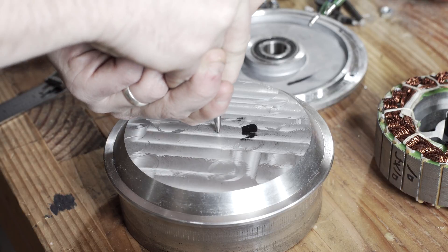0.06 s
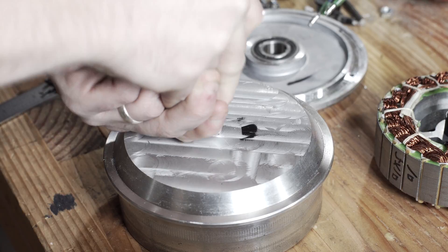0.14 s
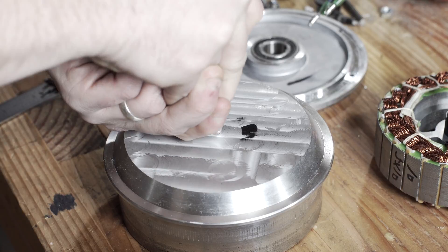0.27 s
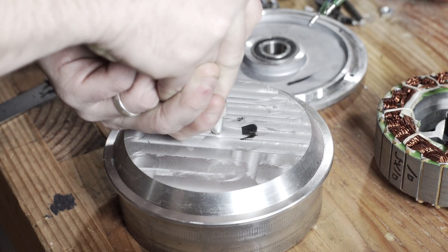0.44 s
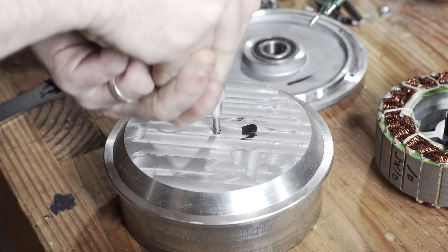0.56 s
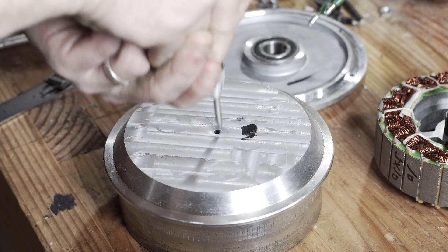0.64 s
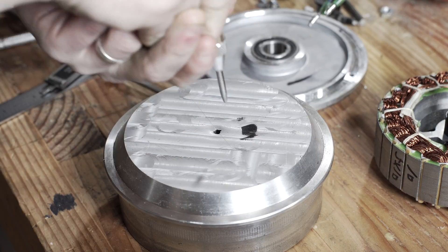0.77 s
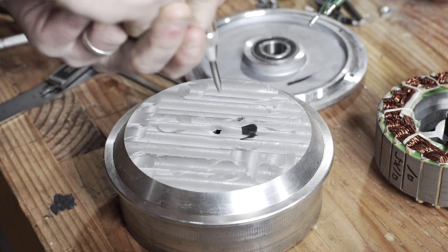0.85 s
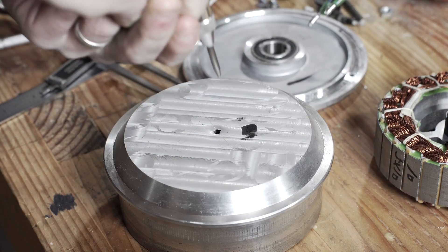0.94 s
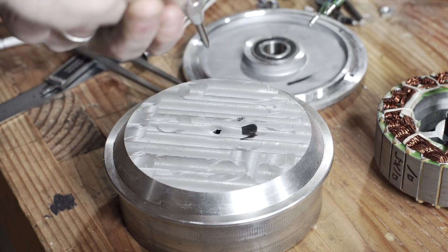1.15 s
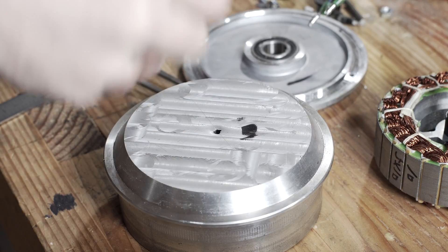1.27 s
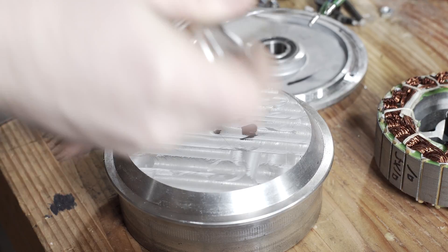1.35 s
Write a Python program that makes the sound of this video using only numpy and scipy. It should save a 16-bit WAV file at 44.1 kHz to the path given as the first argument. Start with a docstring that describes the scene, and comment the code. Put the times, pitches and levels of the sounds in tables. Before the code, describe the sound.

A spring-loaded punch snaps once on an aluminum casing, then scrapes faintly away.

```python
"""Soft knocks and a dull rub, then one hard snap: a spring-loaded metal punch fires on an aluminium
motor casing on a wooden bench, close to a single microphone in a quiet workshop.
The snap overloads the microphone; the punch rebounds, and the casing and the room ring on.
The sleeve slides back with a thin hiss; the tip scrapes and squeaks out of its dent and rings briefly."""
import sys
import numpy as np
from scipy import signal
from scipy.fft import rfft, irfft
from scipy.io import wavfile
from scipy.ndimage import uniform_filter1d

SR = 44100
rng = np.random.default_rng(int(sys.argv[2]) if len(sys.argv) > 2 else 0)


def to_wav(sig):
    """Store sig (one row per channel, or 1-D mono) as 16-bit WAV at the path in sys.argv[1].

    Samples outside -1..1 are clipped; the rate is SR.
    """
    pcm = np.clip(np.atleast_2d(sig), -1, 1) * 32767
    pcm = np.round(pcm).astype(np.int16)
    wavfile.write(sys.argv[1], SR, pcm.T)  # frames by channels


N = 61739
T = np.arange(N) / SR

# The snap and its rebounds. Each row: start in seconds, crack level in dB, its hold and release in
# seconds, air push in dB, gain of the steel ring in dB, treble cut-off of the crack in Hz.
BLOWS = [(0.2153, -4.5, .0022, .0016, -1.5, 3.5, 18000), (0.2253, -15.5, .001, 0.0028, -12.5, -23, 3000),
         (0.2274, -9, .0004, .0016, -4, -22, 7524)]
SNAP_S = BLOWS[0][0]


def amp(db):
    """Decibels to gain."""
    return 10 ** (np.asarray(db) / 20)


def unit(x):
    """Scales to rms 1."""
    return x / np.sqrt(np.mean(x ** 2) + 1e-20)


def since(start):
    """Seconds since a moment, zero before it."""
    return np.maximum(T - start, 0)


def curve_at(points, hz):
    """Interpolates a table on a log-frequency axis."""
    freqs, values = np.transpose(points)
    return np.interp(np.log(hz + 1), np.log(freqs + 1), values)


def noise(colour):
    """Steady noise at rms 1. Each row of a colour: frequency in Hz, relative level in dB."""
    gain = amp(curve_at(colour, np.fft.rfftfreq(N, 1 / SR)))
    return unit(irfft(rfft(rng.standard_normal(N)) * gain, N))


def bursts(rows, decay_s):
    """Envelope of sudden bursts that die quickly."""
    return sum(amp(db) * (T > start) * np.exp(-since(start) / decay_s) for start, db in rows)


def ring(start, modes, rise_s):
    """Dying sines struck together. Each mode: frequency in Hz, level in dB, seconds to fall 60 dB."""
    t = since(start)
    tones = sum(amp(db - 60 * t / t60) * np.sin(2 * np.pi * (hz * t + rng.random()))
                for hz, db, t60 in modes)
    return tones * np.minimum(t / rise_s, 1)


def reverberation(start):
    """Diffuse echoes of the workshop build up, then die fastest in the deep bass and the treble."""
    # Colour of the room. Each row: frequency in Hz, relative level in dB.
    colour = [(40, -28.5), (110, -19.5), (230, -5.5), (320, -13.5), (410, -4.5), (540, -2.5), (640, -7),
              (780, -3), (940, -1.5), (1060, -7.5), (1400, -5), (2300, -5.5), (3600, -11.5), (5200, -2.5),
              (6500, -3), (9000, -10.5), (13500, -11.5), (16000, -21)]
    # Decay of the room. Each row: frequency in Hz, seconds to fall 60 dB.
    t60 = [(100, 0.24), (260, .63), (700, 0.65), (1840, 0.61), (4850, 0.49), (8000, 0.4), (12800, 0.32),
           (16000, .28)]
    hz, t, spectrum = signal.stft(noise(colour), SR, nperseg=512)
    decay = amp(-60 * np.maximum(t - start, 0) / curve_at(t60, hz)[:, None])
    build = .3 + .7 * np.minimum(since(start) / .045, 1) ** 2
    return signal.istft(spectrum * decay, SR, nperseg=512)[1][:N] * build * (T > start)


def workshop():
    """Room tone, with the snap coming back off nearby surfaces and then from all round."""
    # Early echoes. Each row: arrival in seconds, level in dB.
    arrivals = [(.2455, -20.5), (.2545, -21.5), (.2625, -24)]
    # Colours of the dull echoes and the room tone. Each row: frequency in Hz, relative level in dB.
    echo_colour = [(50, -13), (100, -14), (170, 1.5), (300, -5), (500, 3.5), (900, -2.5), (1500, -9.5),
                   (4000, -18.5), (16000, -30)]
    room_tone = [(20, -15), (45, -4), (90, -7), (250, -1.5), (500, -4.5), (1000, -9.5), (2500, -13),
                 (6000, -17), (15500, -22.5)]
    echoes = bursts(arrivals, decay_s=.0053) * noise(echo_colour)
    return echoes + amp(-13) * reverberation(SNAP_S) + amp(-65) * noise(room_tone)


def hand():
    """Soft knocks and a dull rub as the hand seats the punch and presses down."""
    # Seating knocks. Each row: start in seconds, level in dB, frequency in Hz, seconds to fall 60 dB.
    contacts = [(.0345, -43, 1040, 0.033), (.040, -44, 805, 0.025), (.048, -54.5, 316, 0.084),
                (.085, -60.5, 880, 0.061), (.150, -53, 788, 0.11)]
    # Rub of the grip. Each row: frequency in Hz, relative level in dB.
    rub_colour = [(40, -18), (220, 4), (600, 0.5), (1050, -1), (1500, -16), (4000, -25), (16000, -46)]
    knocks = sum(ring(start, [(hz, db, t60)], rise_s=.00051) for start, db, hz, t60 in contacts)
    pressure = np.interp(T, [.02, .04, .12, .2], [.37, .82, .47, .0038])
    return knocks + amp(-56.5) * pressure * noise(rub_colour)


def sleeve():
    """The sleeve slides back over the relaxing spring with an uneven, thin hiss."""
    # Sliding hiss. Each row: frequency in Hz, relative level in dB.
    hiss_colour = [(200, -10.5), (1700, -1), (4000, -5), (8000, -14), (10500, -4.5), (14000, -2.5),
                   (16000, -13.5)]
    grit_db = 2.5 * noise([(1, 0), (110, 0), (1100, -60)])
    swell = np.interp(T, [.58, .685, .8], [0, 1, 0])
    return amp(-58 + grit_db) * swell * noise(hiss_colour)


def tip_lift():
    """The tip squeaks, scrapes and catches on its way out of the dent, then rings free."""
    # The drag. Each row: time in seconds, squeak pitch in Hz, squeak level in dB, scrape level in dB.
    path = [(.713, 3100, -77, -60), (.720, 3143, -39, -51.5), (0.724, 3110, -48.5, -53),
            (.730, 3183, -46, -50), (.737, 3090, -46, -48), (0.742, 3270, -49, -52.5),
            (0.747, 3550, -48, -50.5), (0.754, 3400, -75, -72)]
    # Catches on the rim of the dent. Each row: start in seconds, level in dB.
    catches = [(.7285, -47), (0.7365, -50), (0.742, -58), (0.748, -56)]
    # Friction of the tip. Each row: frequency in Hz, relative level in dB.
    scrape_colour = [(200, -9), (1200, -10.5), (1750, 5.5), (2400, 2), (4400, -4.5), (6200, 6.5),
                     (7800, -4.5), (9500, 3), (12000, -17), (14300, -5), (16000, -24)]
    # Modes of a rim tick and the freed tip. Each row: frequency in Hz, level in dB, seconds to fall 60 dB.
    rim_modes = [(1770, -0.5, 0.0095), (6200, -8, .012)]
    tip_modes = [(3182, -63, .1), (5300, -64, 0.2), (6100, -58, 0.18)]
    times, hz, squeak_db, scrape_db = np.transpose(path)
    touching = (T > times[0]) & (T < times[-1])
    jitter = .0285 * unit(uniform_filter1d(rng.standard_normal(N), size=70))
    phase = 2 * np.pi * np.cumsum(np.interp(T, times, hz) * (1 + jitter)) / SR
    harmonics = sum(amp(-20 * k) * np.sin((k + 1) * phase) for k in range(3))
    squeak = touching * amp(np.interp(T, times, squeak_db)) * harmonics
    friction = touching * amp(np.interp(T, times, scrape_db)) + bursts(catches, decay_s=.0017)
    scrape = friction * noise(scrape_colour)
    ticks = sum(amp(db) * ring(start, rim_modes, rise_s=.00046) for start, db in catches)
    direct = squeak + scrape + ticks
    room = reverberation(0)
    echoes = signal.fftconvolve(direct, room / np.linalg.norm(room))[:N]
    return direct + amp(-18.5) * echoes + ring(catches[-1][0], tip_modes, rise_s=.001)


def casing():
    """The blow pushes the bench, rings the casing and wakes a deep mode of the room; each mode swells and fades
    in the room."""
    # Modes of the casing on the bench. Each row: frequency in Hz, level in dB, seconds to fall 60 dB.
    modes = [(235.8, -40.5, 0.74), (255.8, -40.5, 0.64), (394.4, -26.5, .48), (499.7, -25.5, .5),
             (522.6, -30.5, 0.48), (555.5, -30, .52), (712.5, -31.5, .48), (747.6, -30.5, .48),
             (835.5, -28, .5), (885.5, -30, .62), (951, -29, .58), (1207, -34.5, .58), (1393, -31.5, .38),
             (1483, -30.5, .4), (1553, -32, .45), (2150, -39, 0.85), (2227, -36.5, 0.73), (5101, -37, 0.46),
             (6403, -30.5, .26), (7650, -44.5, 0.59), (7865, -37, .32), (11774, -37.5, .25),
             (12167, -39, .27), (12560, -33.5, .29), (12300, -30, .3)]
    thump_hz, room_mode_hz, flutter_hz, rise_s = 109, 38, 14, .022
    t = since(SNAP_S)
    thump = amp(-27.5) * np.exp(-t / .0032) * np.sin(2 * np.pi * thump_hz * t)
    room_mode = ring(SNAP_S, [(room_mode_hz, -48, 1.1)], rise_s)
    flutter = [(1, 0), (flutter_hz, 0), (10 * flutter_hz, -80)]
    ringing = sum(ring(SNAP_S, [mode], rise_s) * (1 + .45 * noise(flutter)) for mode in modes)
    return thump + room_mode + ringing


def snap():
    """Each blow is a burst of contact noise, a sharp push of air and a short ring of the steel."""
    # Contact noise. Each row: frequency in Hz, relative level in dB.
    crack_colour = [(60, -15), (300, -10.5), (900, -11), (1400, 4.5), (2200, 3.5), (3600, -1), (4500, -3.5),
                    (6000, 0.5), (8000, -5), (10000, 1), (11500, -4.5), (13000, 3), (16000, -7)]
    # Steel punch, damped by the hand. Each row: frequency in Hz, level in dB, seconds to fall 60 dB.
    steel_modes = [(1460, -22, 0.0055), (2250, -20.5, 0.014), (4900, -23, .016), (6032, -11.5, 0.02),
                   (9790, -12, 0.0093), (12610, -4.5, 0.019), (13150, -9.5, 0.0086), (14700, -20.5, .016)]
    push_s = .00007
    out = np.zeros(N)
    for start, crack_db, hold_s, release_s, push_db, steel_db, cut_hz in BLOWS:
        treble_cut = signal.butter(2, cut_hz, fs=SR, output="sos")
        crack = unit(signal.sosfilt(treble_cut, noise(crack_colour)))
        out += amp(crack_db) * crack * (T > start) * np.exp(-since(start + hold_s) / release_s)
        age = since(start) / push_s
        out -= amp(push_db) * np.e * age * (2 - age) * np.exp(-age)
        out += amp(steel_db) * ring(start, steel_modes, rise_s=.00051)
    return out


def scene():
    """Punch, casing and room, heard in mono from beside the bench."""
    return (snap() + casing() + workshop() + hand() + sleeve() + tip_lift())[None]


def record(dry):
    """The microphone clips on the snap; the treble then stops near 16 kHz."""
    clipped = np.clip(dry, -1, 1)
    band_limit = signal.firwin(255, 15850, window=("kaiser", 8), fs=SR)
    return signal.oaconvolve(clipped, band_limit[None], "same")


dry = scene()
out = record(dry)
to_wav(out)
```